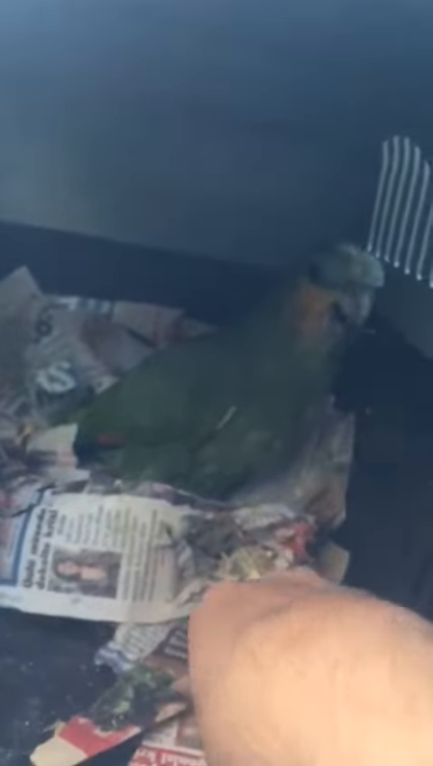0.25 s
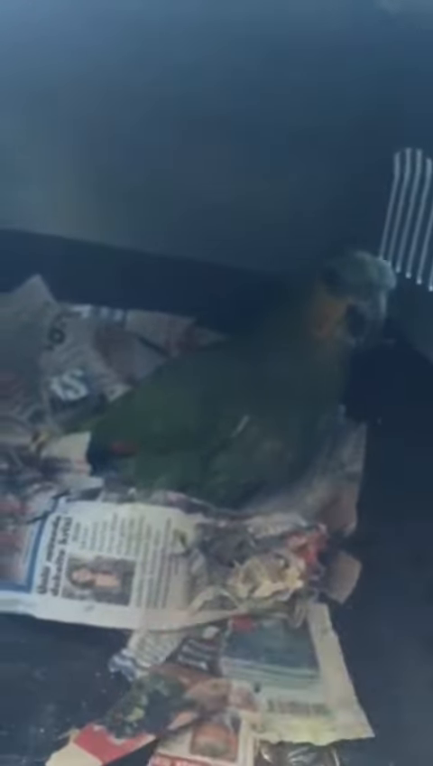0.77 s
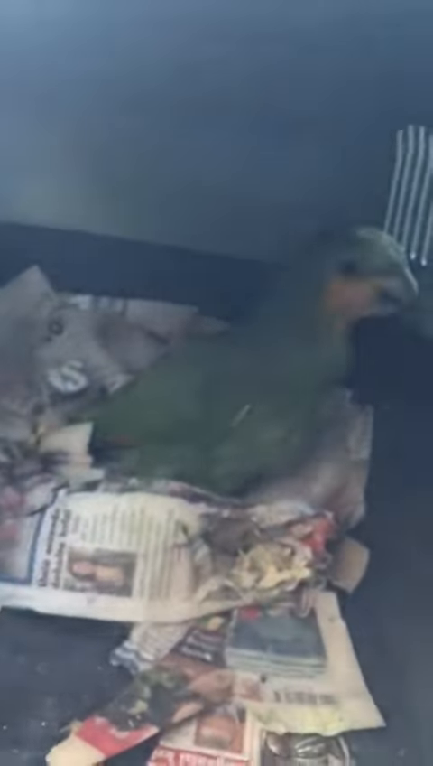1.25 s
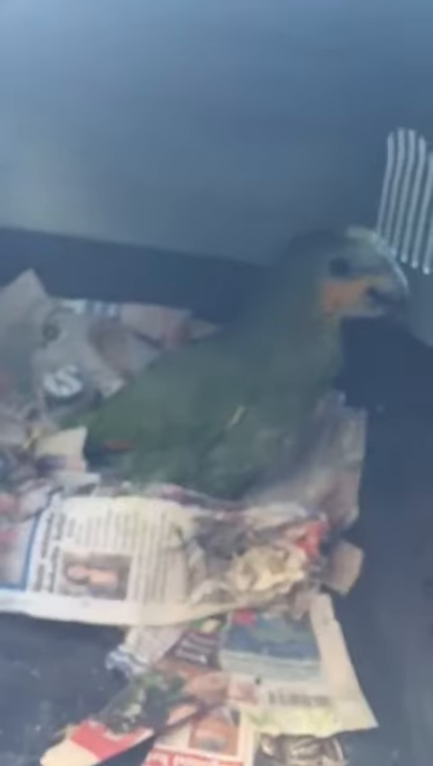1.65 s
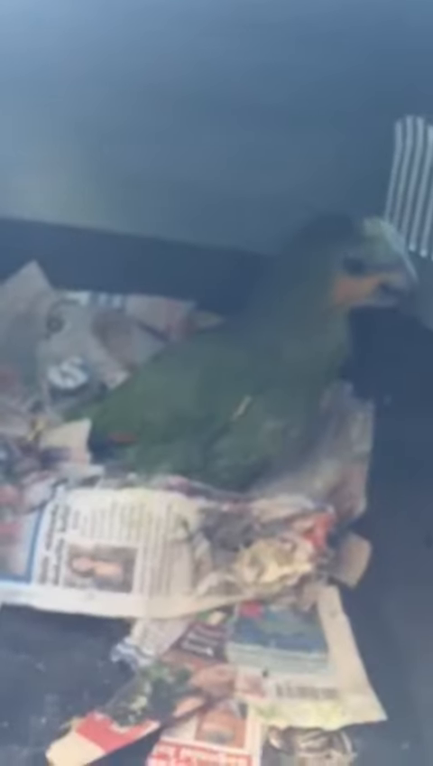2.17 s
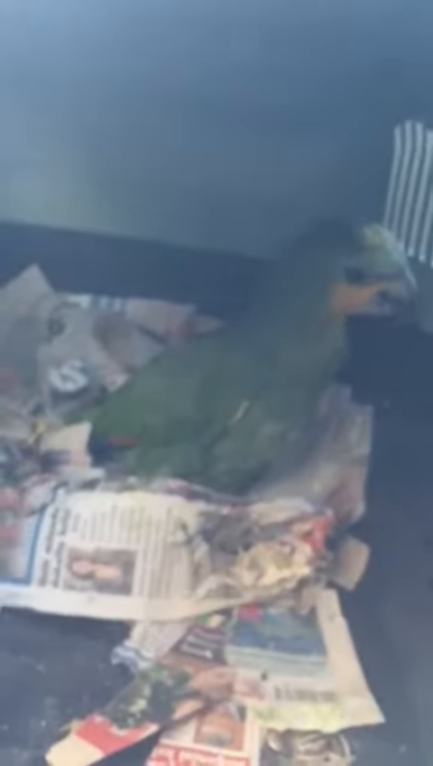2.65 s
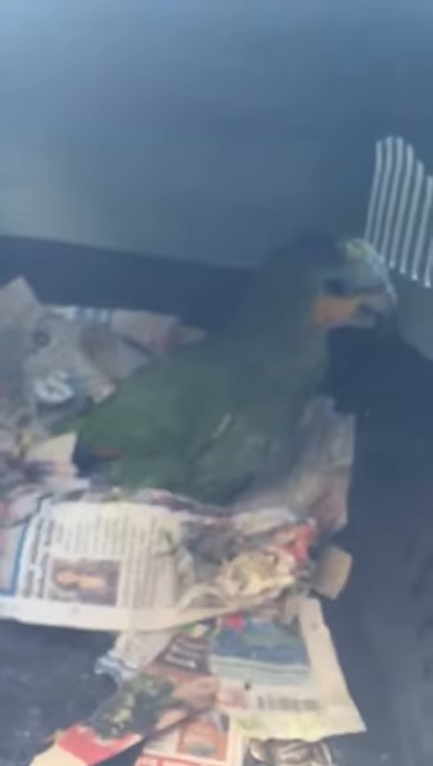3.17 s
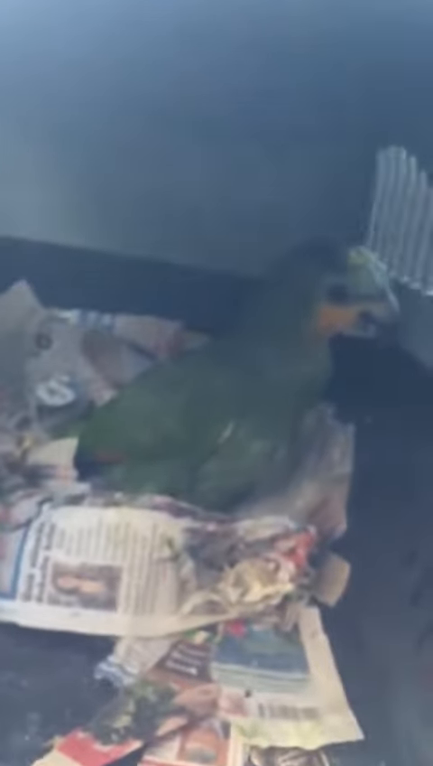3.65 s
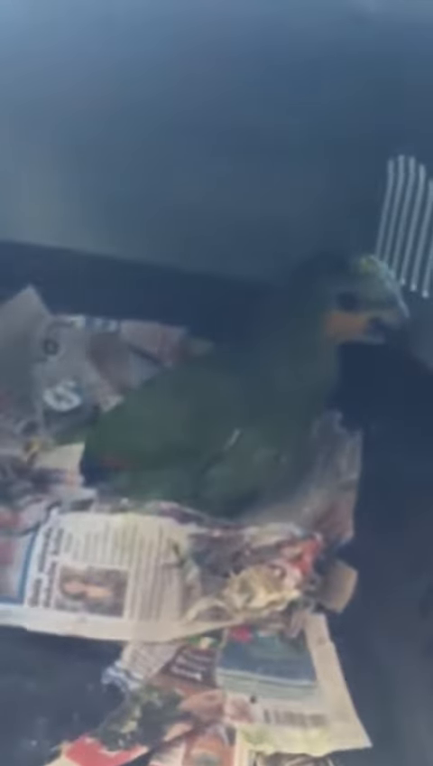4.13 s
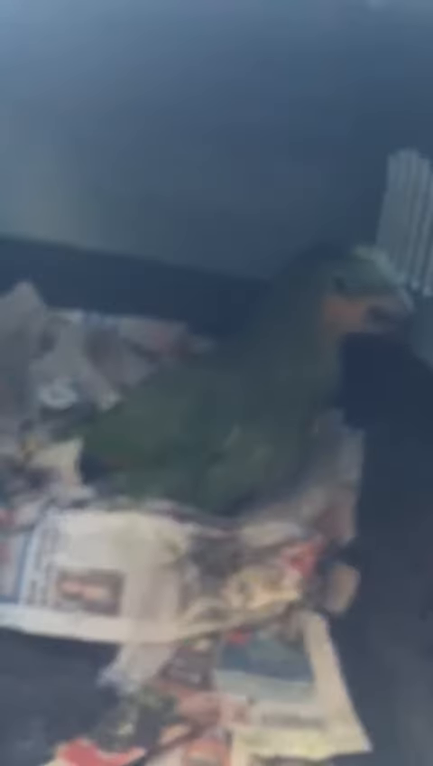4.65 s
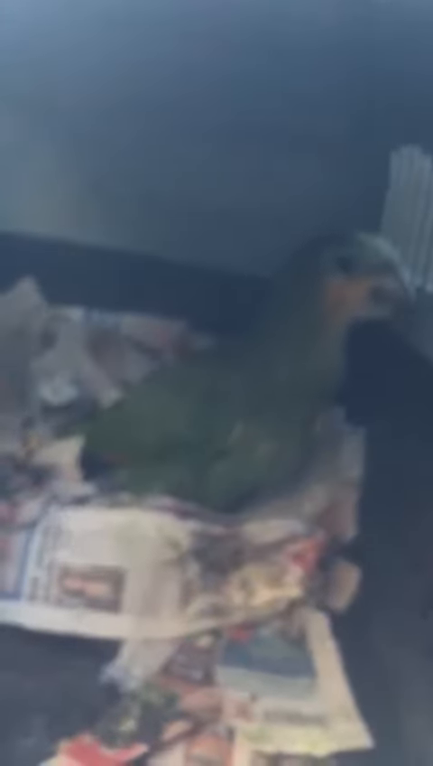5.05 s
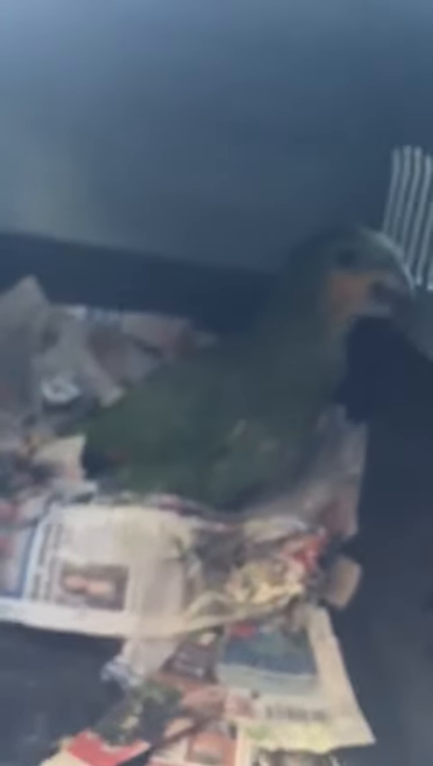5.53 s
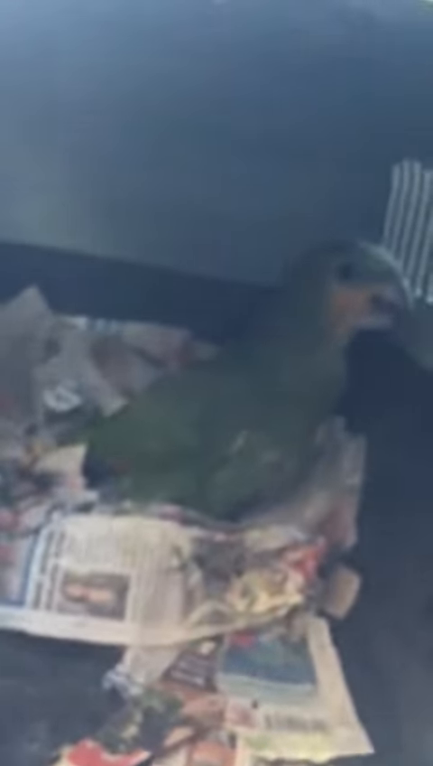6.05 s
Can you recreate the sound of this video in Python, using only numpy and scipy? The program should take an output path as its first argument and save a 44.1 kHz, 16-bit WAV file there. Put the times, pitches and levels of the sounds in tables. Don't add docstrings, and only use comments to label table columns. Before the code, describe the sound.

A bird shifts on newspaper and cracks shells with bright, dry snaps, close up, while distant traffic rumbles softly underneath.

```python
import sys
import numpy as np
from scipy import signal
from scipy.fft import rfft, irfft
from scipy.io import wavfile
from scipy.ndimage import uniform_filter1d

SR = 44100
rng = np.random.default_rng(int(sys.argv[2]) if len(sys.argv) > 2 else 0)


def wrap_up_sound(samples):
    columns = np.atleast_2d(samples).T
    tamed = np.clip(columns, -1, 1)
    steps = np.round(tamed * 32767).astype(np.int16)
    wavfile.write(sys.argv[1], SR, steps)


def makeup_ratio(level_db):
    decades = np.asarray(level_db, float) / 20
    return 10 ** decades


N = 277830
SNAP_LENGTH, LEAD = 4096, 256


def curve(table, column, outside=None):
    rows = np.array(table)
    return np.interp(np.arange(N) / SR, rows[:, 0], rows[:, column], left=outside, right=outside)


def coloured(spectrum, lo_hz, hi_hz):
    hz, points = np.fft.rfftfreq(N, 1 / SR) + 1e-3, np.array(spectrum)
    gain_db = np.interp(np.log(hz), np.log(points[:, 0]), points[:, 1])
    bins = rfft(rng.standard_normal(N)) * makeup_ratio(gain_db)
    in_band = (hz > lo_hz) & (hz < hi_hz)
    return irfft(bins, N) / np.std(irfft(bins * in_band, N))


def walk(rate):
    hold = int(SR / rate)
    steps = np.repeat(rng.standard_normal(N // hold + 1), hold)
    return 1.3 * uniform_filter1d(uniform_filter1d(steps, hold), hold)[:N]


def microphone_hiss():
    # (frequency [Hz], level [dB per Hz]), then its overall level [dB]
    hiss_spectrum, hiss_db = [(290, -34.5), (500, -6.5), (528, -9), (596, -2), (848, -11.5), (919, -5.5),
                              (1020, -7.5), (1940, -11.5), (2160, -12), (2710, -12.5), (3110, -13.5),
                              (4860, -16), (9050, -20), (11600, -22.5), (12700, -40.5), (16500, -72),
                              (22000, -120)], -72
    return makeup_ratio(hiss_db + 0.37 * walk(2)) * coloured(hiss_spectrum, 700, 13000)


def rumble():
    # (frequency [Hz], level [dB per Hz])
    rumble_spectrum = [(15, -35), (25, -11), (48, -5), (76, -5), (92, -7.5), (119, -10), (156, -17),
                       (210, -15), (438, -31.5), (637, -38), (900, -36.5), (1170, -72.5), (1980, -120)]
    # (time [s], level [dB])
    rumble_level = [(0.0, -59), (0.7, -61), (1.1, -60), (5.25, -62), (5.63, -66.5), (6.3, -61)]
    bins = rfft(coloured(rumble_spectrum, 100, 400))
    octave = np.log2(np.fft.rfftfreq(N, 1 / SR) + 1e-3)
    out = 0
    for centre in np.arange(12, 33) / 3:
        patch = irfft(bins * np.clip(1 - 3 * abs(octave - centre), 0, 1), N)
        unrest = np.clip(200 / 2 ** centre, .2, 1)
        out = out + patch * makeup_ratio(unrest * (2.0 * walk(3) + 3.7 * walk(7)))
    return makeup_ratio(curve(rumble_level, 1)) * out


def engines():
    # (time [s], pitch [Hz], level [dB])
    drone_low = [(0.0, 52.93, -40), (0.54, 55.67, -56.5), (0.58, 55.58, -55), (1.26, 50.48, -51),
                 (1.6, 55, -49), (1.88, 50.11, -47.5), (3.3, 50.51, -51), (3.58, 54.58, -49),
                 (4.46, 52.38, -53.5), (4.61, 56.45, -53.5), (6.23, 54.77, -56.5), (6.3, 55.5, -53)]
    # (time [s], pitch [Hz], level [dB])
    drone_main = [(0.0, 62.4, -45), (0.52, 65.75, -53), (0.63, 64.3, -41.5), (0.79, 59.6, -62),
                  (0.93, 70.52, -58.5), (1.33, 68.24, -50.5), (2.68, 68.08, -45), (3.26, 68.22, -51.5),
                  (3.56, 65.52, -46), (4.25, 65.3, -53), (4.35, 60.64, -50), (4.6, 60.03, -50.5),
                  (5.74, 62.6, -54), (5.84, 67.9, -65), (6.26, 62.6, -53), (6.3, 63.0, -72)]
    # (time [s], length [s], pitch at start [Hz], pitch at end [Hz], level [dB])
    passers = [
        (0, 0.58, 169.1, 178, -65.5),
        (0.506, 0.65, 75, 74.2, -52.5),
        (.8, 1.78, 131.6, 142.3, -59.5),
        (1.296, 0.5, 160.7, 164.3, -64),
        (1.398, 2.06, 83.8, 89.5, -54.5),
        (2.296, 1.17, 197.4, 213.1, -67.5),
        (3.3, 0.81, 132.9, 133.4, -61),
        (3.302, 1.63, 89.6, 92, -56.5),
        (3.6, 1.1, 211.9, 213, -65.5),
        (4.502, 1.9, 73.92, 71.4, -55.5),
    ]
    # (time [s], half length [s], depth [dB])
    lulls = [
        (0.485, 0.067, -19),
        (.92, 0.06, -9),
        (1.446, 0.028, -14),
        (3.302, 0.052, -6),
        (4.546, 0.024, -9.5),
        (5.36, 0.055, -8.5),
        (5.807, .05, -15),
    ]
    swell_power = 0.55
    t, out = np.arange(N) / SR, 0
    lull = makeup_ratio(sum(db * np.exp(-((t - s) / half) ** 2) for s, half, db in lulls))
    tones = [(curve(table, 1), makeup_ratio(curve(table, 2))) for table in (drone_low, drone_main)]
    for s, length, hz0, hz1, db in passers:
        part = np.clip((t - s) / length, 0, 1)
        swell = np.abs(np.sin(np.pi * part)) ** swell_power * (part < 1)
        tones.append((hz0 + (hz1 - hz0) * part, makeup_ratio(db) * swell))
    for hz, size in tones:
        phase = 2 * np.pi * np.cumsum(hz * (1 + .01 * walk(10))) / SR
        unsteady = uniform_filter1d(size * makeup_ratio(2.5 * walk(9)), size=1000)
        out = out + np.sqrt(2) * lull * unsteady * np.sin(phase + 6 * rng.random())
    return out


def rustle():
    # (time [s], length [s], level [dB], centre [Hz], width [Hz])
    slides = [(0, 0.042, -59.5, 5460, 7100), (0.125, 0.03, -67.5, 11210, 2200),
              (0.257, 0.096, -69.5, 10600, 3030), (0.261, 0.026, -67, 4160, 2480),
              (0.601, 0.1, -70.5, 5970, 9100), (0.75, 0.24, -74, 5004, 8000),
              (1.003, 0.45, -73, 5030, 9000), (1.168, 0.029, -82, 6950, 5000),
              (1.653, 0.02, -63, 10890, 3000), (1.696, 0.034, -76, 6510, 1499),
              (3.951, 0.037, -82.5, 5727, 1018), (3.99, 0.037, -62, 5800, 1800),
              (3.995, 0.018, -69, 10540, 1994), (4.101, 0.021, -67.5, 5550, 2010),
              (4.253, 0.03, -66.5, 6220, 1800), (4.487, 0.069, -67, 5580, 1006),
              (4.905, 0.035, -71, 10700, 2486), (4.909, 0.026, -68, 4500, 6036),
              (5.791, 0.049, -66, 2990, 4000), (5.879, 0.057, -67.5, 3000, 4000)]
    out, t = np.zeros(N), np.arange(N) / SR
    grains = rng.standard_normal(N) * makeup_ratio(2.9 * walk(300))
    for s, length, db, hz, width in slides:
        edges = np.clip((hz - width / 2, hz + width / 2), 300, 13000)
        band = signal.sosfilt(signal.butter(2, edges, "bandpass", fs=SR, output="sos"), grains)
        corners = (s - 0.11 * length, s + 0.098 * length, s + 0.53 * length, s + 1.26 * length)
        power = np.interp(t, corners, (0.00054, 0.75, 0.67, 0.0))
        out += makeup_ratio(db) * np.sqrt(power) * band / np.std(band)
    return out


def thuds():
    # (time [s], peak [dB], pitch [Hz], fall by 60 dB [s])
    booms = [
        (.822, -46, 560, .05),
        (.951, -44, 560, .05),
        (.9515, -36, 280, .06),
        (.952, -42, 330, .04),
        (2.097, -49, 540, .05),
        (4.413, -58, 600, .04),
        (6.12, -60, 270, .25),
        (6.13, -62, 215, .3),
        (6.135, -68, 410, .2),
    ]
    out = np.zeros(N)
    for s, db, hz, t60 in booms:
        start = int(s * SR)
        t = np.arange(min(SR // 2, N - start)) / SR
        push = 1 - np.exp(-t / (0.044 * t60))
        out[start:][:len(t)] += makeup_ratio(db - 60 * t / t60) * push * np.sin(2 * np.pi * hz * t)
    return out


def splinters(s, db, hz):
    mean_gap_s, first_db, fall_db_per_s, scatter_db, detune = 0.0061, -14.5, 899.5, 5.5, .07
    luck = rng.random((3, 3))
    delays = mean_gap_s * np.cumsum(.5 + luck[:, 0])
    flying = []
    for late, scatter, shape in zip(delays, *(2 * luck[:, 1:].T - 1)):
        level = db + first_db - fall_db_per_s * late + scatter_db * scatter
        flying.append((s + late, level, hz * (1 + detune * (1 + shape))))
    return flying


def creak_slips():
    # (time [s], length [s], wall knock [dB], paper [dB rel], shell [dB rel])
    creaks = [
        (0.037, 0.01, -53, 6.5, -13.5),
        (1.65, .014, -45, -14, -18),
        (2.934, 0.00392, -67.5, 19.5, -11),
        (3.708, .003, -69.5, -21, -19.5),
        (4.6547, 0.0022, -68, -5, -9),
        (5.649, 0.016, -55.5, -1.5, -10.5),
        (5.797, .016, -53.5, -19, -12.5),
        (5.809, 0.022, -58.5, -3, -16.5),
        (5.8877, 0.029, -58.5, -19, -21.5),
        (5.91, 0.016, -55.5, -2.5, -14),
    ]
    fade_db, scatter_db, tick_db, shell_hz = -3.5, 4, -27, 5200
    slips = []
    for s, length, db, paper, shell in creaks:
        luck = rng.random((4, 2))
        for k, (nudge, scatter) in enumerate(luck):
            part = (k + (k > 0) * (nudge - .5) / 2) / (len(luck) - 1)
            level = db + shell + fade_db * part + scatter_db * (2 * scatter - 1)
            slips.append((s + length * part, level, -shell, paper - shell, tick_db - shell, shell_hz))
    return slips


def touches():
    # (time [s], shell ring [dB], wall knock [dB rel], paper [dB rel], tick [dB rel])
    taps = [(0.1333, -57, -18, 1, 3), (0.148, -61.5, .1, 1.5, -3), (0.798, -71.5, -3.5, 7, 5),
            (0.8622, -67, -8, -1.5, -9), (0.9276, -66.5, -9, -4, -0.5), (1.095, -72.5, 4.5, 1, 4),
            (1.1701, -80, -6, -8, 7), (1.222, -68, -6, 8, 7), (1.2806, -68.5, -0.5, 11, 6),
            (1.4364, -69.5, -5.5, -8, 10), (1.463, -69, -12, -19.5, -14), (2.088, -68, -16, -9, -11),
            (2.136, -64, -13, -8, -5.5), (1.655, -56.5, -10.5, -16, 6), (2.1743, -57, -9, -3, -10),
            (2.5087, -68, -15.5, -7, 4), (2.5327, -72, -8, -11, 1), (2.9739, -68.5, -4, -2, -12.5),
            (3.2326, -72, -12.5, -7.5, -14), (4.258, -59, -8.5, -6.5, -21), (4.519, -61, -20.5, -3, -12),
            (4.633, -61.5, -5, -2, -13), (4.7306, -60.5, -5.5, -9, -10), (4.7498, -62.5, -12, -8, -6.5)]
    # (time [s], shell ring [dB], wall knock [dB rel], paper [dB rel], shell pitch [Hz])
    cracks = [(0.135, -51, -13, -13, 5200), (0.1624, -40.5, -7.5, 5, 4740),
              (0.2673, -51.5, -10, -11.5, 4300), (0.6382, -45, -11.5, -17, 6540),
              (0.6643, -42, -5.5, -8.5, 5840), (0.82, -15, -15, -8, 6006), (.9501, -16, -11, -7, 5970),
              (1.1049, -48.5, -4.5, -2, 5700), (1.2238, -46.5, -3.5, -1.5, 6030),
              (1.2919, -48, -9, 2, 5900), (2.0954, -25.5, -6, -2.5, 6700), (2.1477, -41, -1, 1, 5906),
              (2.1542, -25.5, -24, -13, 6272), (2.2816, -52, -14, -0.5, 6320),
              (2.9365, -42.5, -17, 7, 5990), (4.2977, -51.5, -22, -14, 6425), (4.3488, -41, -20, -16, 6600),
              (4.3564, -32, -18.5, -8.5, 5950), (4.3692, -40.5, -24, -12, 6030),
              (4.383, -48.5, -10, -10, 6100), (4.4, -42.5, -4, -12, 5760), (4.4116, -22, -18.5, -11, 5700),
              (4.54, -53, -24.5, -9, 6340), (4.7379, -39.5, -16, -8, 5760)]
    sharp = [(*tap, 6100) for tap in taps]
    for s, db, wall, paper, hz in cracks:
        tick = -10.5 - 0.26 * (db + 36)
        sharp.append((s, db, wall, paper, tick, hz))
        for splinter_s, level, splinter_hz in splinters(s, db, hz):
            sharp.append((splinter_s, level, wall + 1, paper + 1, tick, splinter_hz))
    return sharp, creak_slips()


def ring(burst, modes, scatter_db, detune):
    hz = np.fft.rfftfreq(SNAP_LENGTH, 1 / SR) + 1e-3
    chance = rng.standard_normal((len(burst), len(modes), 2))
    response = 0
    for k, (f, width, db) in enumerate(modes):
        centre = f * (1 + detune * chance[:, k, :1])
        gain = (-1) ** k * makeup_ratio(db + scatter_db * chance[:, k, 1:])
        response = response + gain / (1 + 1j * (hz / centre - centre / hz) * f / width)
    edges = (.85 * modes[0][0], 1.4 * modes[-1][0])
    span = signal.butter(2, edges, "bandpass", fs=SR, output="sos")
    response = response * signal.sosfreqz(span, hz, fs=SR)[1]
    y = irfft(rfft(burst, axis=1) * response, SNAP_LENGTH, axis=1)
    early = y[:, :LEAD + SR * 3 // 1000]
    return y / np.sqrt(np.mean(early ** 2, axis=1, keepdims=True) * 3)


def snaps():
    # (frequency [Hz], width [Hz], level [dB])
    shell_modes = [(4620, 200, 7), (5530, 500, 2.5), (6370, 740, 3.5), (7320, 1800, 4), (7840, 900, 2.5)]
    # (frequency [Hz], width [Hz], level [dB])
    wall_modes = [(816, 150, -3.5), (1189.6, 200, 5.5), (1480, 600, 1.5), (1800, 150, -3.5)]
    # (frequency [Hz], width [Hz], level [dB])
    paper_modes = [(1910, 250, 0), (2730, 480, 0.41), (3450, 340, -0.95), (4000, 450, -0.53),
                   (4500, 170, 0.81)]
    # (frequency [Hz], width [Hz], level [dB])
    tick_modes = [(8400, 330, -1.6), (8950, 1000, -2), (11420, 560, 1), (11550, 700, -1.7)]
    sharp, slips = touches()
    columns = np.transpose([*sharp, *slips])
    s, db, wall_db, paper_db, tick_db, shell_hz = (c[:, None] for c in columns)
    t = (np.arange(SNAP_LENGTH) - LEAD) / SR
    after = np.maximum(t, 0)
    chance = rng.standard_normal((len(s), 2, SNAP_LENGTH))
    grains = chance[:, 0] * makeup_ratio(5.0 * chance[:, 1])
    answer = 1 - np.exp(-(after / .0013) ** 2)
    echoes = makeup_ratio(-21.5) * answer * (makeup_ratio(-60 * after / 0.026) + makeup_ratio(-35.5 - 60 * after / 0.16))
    lead_in = (t < 0) * makeup_ratio(-45 + 60 * t / .015)
    burst = grains * (echoes + lead_in)
    burst[:, LEAD] = np.clip(makeup_ratio(0.11 * (db[:, 0] + 32)), 0, 1.3)
    burst[len(sharp):, LEAD] = 1.6
    shell = [(f, width, mode_db - 5.0 * ((f - shell_hz) / 1000) ** 2) for f, width, mode_db in shell_modes]
    paper = []
    for f, width, mode_db in paper_modes:
        paper.append((f, width, mode_db - 0.82 * (wall_db + 4) * np.log2(f / 3200)))
    parts = ((shell, 0), (wall_modes, wall_db), (paper, paper_db), (tick_modes, tick_db))
    sound = makeup_ratio(db) * sum(makeup_ratio(rel) * ring(burst, modes, scatter_db=2.5, detune=0.0095) for modes, rel in parts)
    fade = np.cos(np.pi / 2 * after / t[-1])
    out = np.zeros(N + SNAP_LENGTH)
    np.add.at(out, (s * SR).astype(int) - LEAD + np.arange(SNAP_LENGTH), sound * fade)
    return out[:N]


def scene():
    background = microphone_hiss() + rumble() + engines()
    bird = rustle() + thuds() + snaps()
    return (background + bird)[None]


def top_cut(x):
    return signal.sosfilt(signal.butter(12, 12850, fs=SR, output="sos"), x)


def record(dry):
    # (frequency [Hz], width [Hz], level [dB])
    port_bands = [(4980, 300, -2.5), (11200, 330, 1.5)]
    hz = np.fft.rfftfreq(N, 1 / SR)
    port_db = sum(db * np.exp(-((hz - f) / width) ** 2) for f, width, db in port_bands)
    x = irfft(rfft(dry) * makeup_ratio(port_db), N)
    x = signal.sosfilt(signal.butter(4, 42, "highpass", fs=SR, output="sos"), x)
    x = signal.sosfilt(signal.cheby2(10, 60, 13400, fs=SR, output="sos"), x)
    return top_cut(x)


dry = scene()
out = record(dry)
wrap_up_sound(out)
```